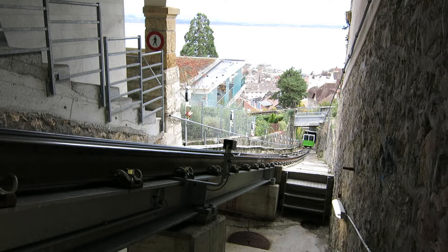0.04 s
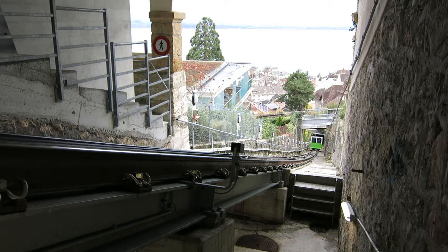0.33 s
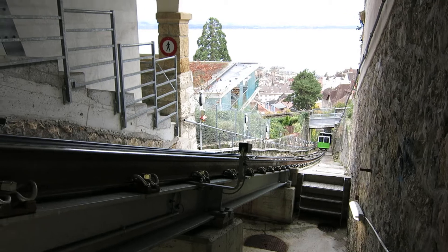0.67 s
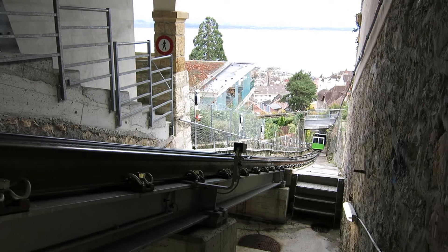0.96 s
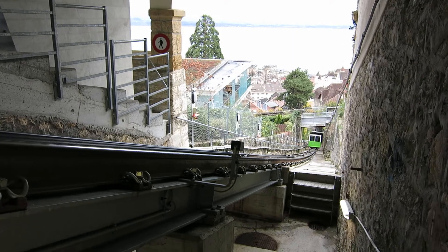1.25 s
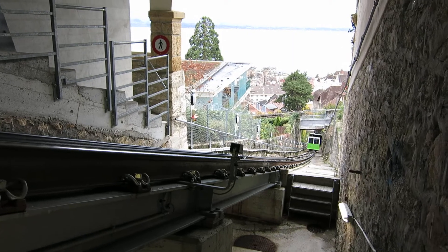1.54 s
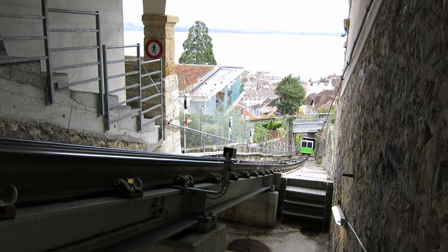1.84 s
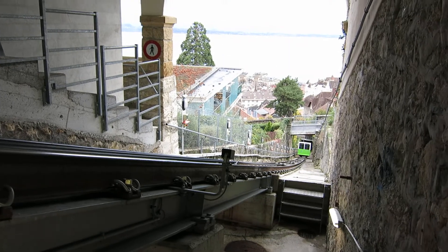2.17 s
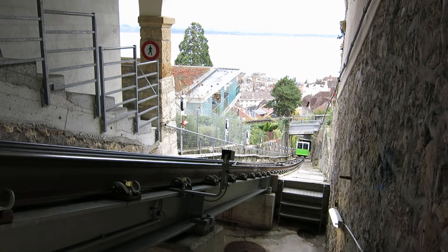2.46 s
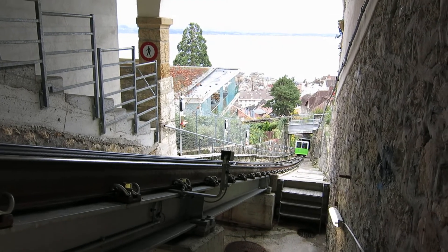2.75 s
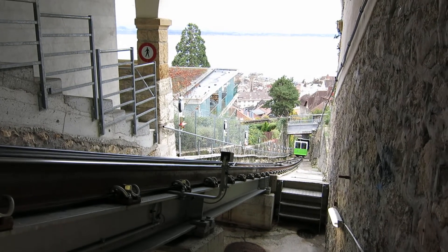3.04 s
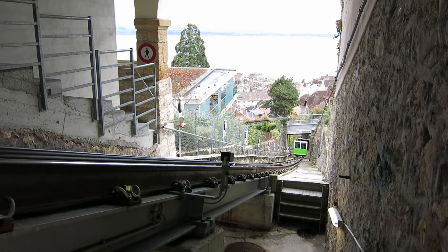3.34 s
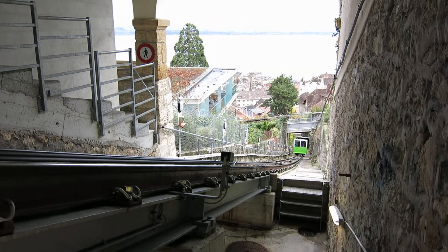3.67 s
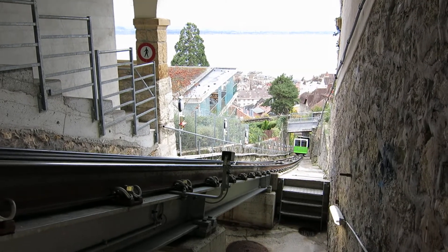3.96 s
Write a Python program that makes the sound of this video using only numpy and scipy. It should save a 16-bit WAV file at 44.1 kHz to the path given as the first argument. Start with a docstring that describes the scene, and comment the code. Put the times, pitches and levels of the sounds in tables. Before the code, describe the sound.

A funicular cable rumbles steadily over its pulleys under the hum and whine of the drive. A few sharp, close clicks with hollow knocks sound in the stone station, then a thin pulley ring swells over faint hiss.

```python
"""A stone funicular station: the cable rumbles over its ringing sheaves under the hum and whine of the drive.
The sound cuts in abruptly; the machinery is centred at first, then spreads very wide within half a second. Thin
hiss lies on top, brighter on the left. A few sharp, close clicks each carry a short hollow knock and a faint
answer from the stone walls."""
import sys
import numpy as np
from scipy.fft import rfft, irfft, next_fast_len
from scipy.io import wavfile
from scipy.ndimage import map_coordinates

SR = 44100
rng = np.random.default_rng(int(sys.argv[2]) if len(sys.argv) > 2 else 0)


def persist_wave(psi):
    """Save psi, clipped to +-1, as 16-bit WAV."""
    counts = np.round(np.clip(psi, -1, 1) * 32767).astype(np.int16)
    wavfile.write(sys.argv[1], SR, np.atleast_2d(counts).T)


N = 176400
T = np.arange(N) / SR


def amp(db):
    """Decibels to gain."""
    return 10 ** (np.asarray(db) / 20)


def along(points, hz):
    """Read (frequency [Hz], value) points on a log axis."""
    freqs, values = np.transpose(points)
    return np.interp(np.log(hz + 1), np.log(freqs + 1), values)


def fader(points):
    """A fader ride: (time [s], level [dB]) points as one gain per sample."""
    return amp(np.interp(T, *np.transpose(points)))


def eq(points):
    """An EQ curve through (frequency [Hz], gain [dB]) points."""
    return lambda hz: amp(along(points, hz))


def band(centre_hz, octaves):
    """A bell-shaped band-pass on a log axis."""
    return lambda hz: np.exp(-.5 * (np.log2((hz + 1) / centre_hz) / octaves) ** 2)


def filtered(x, response):
    """Run x through a complex frequency response."""
    size = next_fast_len(N + SR // 2)
    return irfft(rfft(x, size) * response(np.fft.rfftfreq(size, 1 / SR)), size)[..., :N]


def noise(spectrum):
    """Mono noise shaped by (frequency [Hz], density [dB/Hz]) points."""
    return filtered(rng.standard_normal(N), eq(spectrum)) * np.sqrt(SR / 2)


def stereo_noise(response, alike):
    """Coloured stereo noise of rms 1; alike is the correlation of its sides."""
    mid, side = filtered(rng.standard_normal((2, N)), response)
    spread = np.arccos(alike) / 2
    both = np.cos(spread) * mid + np.sin(spread) * np.array([side, -side])
    return both / both.std()


def wobble(per_s):
    """A smooth random modulator of rms 1, with per_s knots a second."""
    curve = map_coordinates(rng.standard_normal(1024), [T * per_s], mode="wrap")
    return curve / curve.std()


def tone(hz, unsteady, flutter_per_s):
    """A tone of rms 1, from pure (unsteady 0) to fully smeared (unsteady 1)."""
    flutter = wobble(flutter_per_s) + 1j * wobble(flutter_per_s)
    steady = np.sqrt(2 * (1 - unsteady ** 2))
    carrier = np.exp(2j * np.pi * (hz * T + rng.random()))
    return np.real((steady + unsteady * flutter) * carrier)


def mode(t, hz, db, t60, lag):
    """One dying stereo resonance, the right side trailing by lag radians."""
    return amp(db - 60 * t / t60) * np.sin(2 * np.pi * hz * t - np.array([[0], [lag]]))


# hiss colour on the left, on the right and in the middle (frequency [Hz], density [dB/Hz])
HISS_LEFT = [(60, -120), (600, -92), (2500, -100), (3400, -85), (4600, -86), (6000, -88.5), (8000, -89.5),
             (10000, -84), (11700, -80.5), (13000, -88.5), (15500, -101)]
HISS_RIGHT = [(60, -120), (600, -69), (2500, -82), (3400, -85), (4600, -89), (6000, -107), (8000, -103),
              (11700, -104), (15500, -114)]
HISS_MIDDLE = [(60, -120), (600, -95), (2500, -91.5), (3400, -107.5), (4600, -89.5), (6000, -92.5),
               (8000, -101), (11700, -107), (15500, -118)]
# fader ride of the hiss bed (time [s], level [dB])
HISS_RIDE = [(.25, 1), (.72, 5.5), (.79, -0.5), (1.55, -0.5), (1.6, -3), (2.1, -1.5), (3.84, -2.5),
             (3.9, -4), (4, -4)]
# hiss swells (start [s], end [s], rise [s], fall [s], centre [Hz], width [oct], left [dB], right [dB])
HISS_SWELLS = [ (.3, 0.49, 0.088, 0.056, 10600, 0.23, -48, -43),
               (.2, 0.727, .02, .022, 4300, 0.5, -43, -45), (0.46, 0.673, .05, .04, 4900, 0.62, -47, -40.5),
               (2.36, 2.375, .025, .16, 11500, .3, -47.5, -69), ]

def hiss():
    """A thin bed of hiss, brighter on the left, with a few brief, narrow-band swells."""
    sides = np.array([noise(HISS_LEFT), noise(HISS_RIGHT)])
    out = fader(HISS_RIDE) * (sides + noise(HISS_MIDDLE))
    for start, end, rise, fall, centre_hz, octaves, left_db, right_db in HISS_SWELLS:
        outside_hold = np.maximum(np.maximum((start - T) / rise, (T - end) / fall), 0)
        swell = stereo_noise(band(centre_hz, octaves), alike=.92) * np.exp(-outside_hold ** 2)
        out += amp([[left_db], [right_db]]) * swell
    return out


# ring of the snap (frequency [Hz], level [dB], t60 [s], right-side lag [rad])
SNAP_MODES = [(1820, -12, 0.0058, .5), (3560, -4, .003, 1.4), (4430, 0.5, 0.0031, 2),
              (6070, -26, .005, 2.4)]

def snap(t, rasp, rasp_t60_s=.01, wall_db=-18.5, wall_t60_s=.09):
    """A click's attack: very short modes and a burst of rasp, faintly answered by the stone walls."""
    ring = sum(mode(t, *row) for row in SNAP_MODES)
    burst = amp(-60 * t / rasp_t60_s)
    wall_tail = amp(wall_db - 60 * t / wall_t60_s)
    return ring + rasp * (burst + wall_tail)


# hollow body of the knock (frequency [Hz], level [dB], t60 [s])
KNOCK_MODES = [(315, 1, .045), (430, -6, .03), (560, 0, .028), (690, -3, .022), (1350, -9, .009),
               (2300, -15, .006)]

def knock(t, tilt_db, pivot_hz=500, rise_s=.0011, right_db=-1):
    """A click's body: damped modes tilted by tilt_db an octave, the sides nearly opposite in phase."""
    body = sum(mode(t, hz, db + tilt_db * np.log2(hz / pivot_hz), t60, lag=3.1)
               for hz, db, t60 in KNOCK_MODES)
    attack = 1 - np.exp(-t / rise_s)
    return amp([[0], [right_db]]) * body * attack


# EQ of the snap's rasp and of the bright tick (frequency [Hz], gain [dB])
RASP_EQ = [(400, -3), (2000, 9), (2800, -4), (4600, -3), (6400, 4), (7500, -26), (11000, -24), (16000, -35)]
TICK_EQ = [(1500, -2), (5500, 2), (8500, -1), (11000, -9), (13300, -3), (15500, -10)]
# click cues (time [s], snap [dB], tick [dB], knock [dB], knock tilt [dB/oct])
CLICK_CUES = [(1.098, -9, -21, -16, -1), (1.1145, -22, -46, -16, 0), (1.3049, -28, -34, -12.5, -5),
              (1.561, -27, -24.5, -10, 3), (1.676, -28, -32, -16.5, -6)]

def clicks(rasp_db=-8, tick_right_db=-6, tick_t60_s=.0046, low_cut_hz=110):
    """Sharp, close clicks, each stacked from a snap, a bright tick of noise and a hollow knock."""
    rasp = amp(rasp_db) * stereo_noise(eq(RASP_EQ), alike=.16)
    tick = amp([[0], [tick_right_db]]) * stereo_noise(eq(TICK_EQ), alike=.16)
    out = np.zeros((2, N))
    t = np.arange(SR // 2) / SR
    for start_s, snap_db, tick_db, knock_db, tilt_db in CLICK_CUES:
        onset = round(start_s * SR)
        span = slice(onset, onset + len(t))
        out[:, span] += amp(snap_db) * snap(t, rasp[:, span])
        out[:, span] += amp(tick_db - 60 * t / tick_t60_s) * tick[:, span]
        out[:, span] += amp(knock_db) * knock(t, tilt_db)
    return filtered(out, lambda hz: (1j * hz / (low_cut_hz + 1j * hz)) ** 2)


# rumble of cable and sheaves (frequency [Hz], density [dB/Hz])
CABLE_RUMBLE = [(15, -110), (28, -94), (42, -76.5), (56, -70.5), (90, -61.5), (160, -63), (210, -54.5),
                (300, -53), (390, -51), (470, -45), (610, -47.5), (700, -48.5), (810, -48), (875, -46.5),
                (920, -52.5), (985, -47), (1070, -50), (1250, -52.5), (1460, -54.5), (1570, -61.5),
                (1760, -62.5), (2100, -68.5), (2500, -72.5), (3000, -81.5), (4000, -95.5), (8000, -115)]
# fader ride of the sheaves' ring (time [s], level [dB])
SHEAVE_RIDE = [(.25, -61), (1.85, -54), (2.2, -21.5), (2.45, -38), (2.75, -22), (3.2, -31), (3.8, -22),
               (4, -22)]

def cable():
    """The cable rumbles over its sheaves, whose narrow ring swells in the second half."""
    ring = filtered(rng.standard_normal(N), band(centre_hz=823, octaves=.08))
    return noise(CABLE_RUMBLE) + fader(SHEAVE_RIDE) * ring / ring.std()


# quiet partials of the drive (frequency [Hz], level [dB], unsteady share [0-1])
DRIVE_PARTIALS = [(110, -45, .9), (130, -41.5, .95), (148, -44, .8), (174, -42.5, .85), (228, -41, .8),
                  (759.5, -40, .7), (982.6, -39, .7), (1117, -38, .8), (1155, -41, .8), (1189, -42, .6),
                  (1491, -44, .6), (1649, -50, .5), (1771.5, -49, .5), (2331, -50.5, .5), (2797, -62, .7),
                  (2890.5, -58, .5), (3484, -65, .5)]
# fader rides of the drive's hum and whine (time [s], level [dB])
HUM_RIDE = [(.25, -24), (.65, -26), (1.15, -32), (1.38, -27.5), (1.6, -27), (1.82, -35), (1.92, -23),
            (2.1, -31), (2.25, -28), (2.9, -32), (3.35, -31), (3.52, -24), (3.68, -32), (3.8, -27),
            (4, -32)]
WHINE_RIDE = [(.25, -15.5), (.5, -19), (.66, -19), (.8, -24), (1.55, -22.5), (1.7, -24), (2.1, -24.5),
              (2.2, -21), (2.3, -25), (2.48, -25), (2.53, -18), (2.6, -24), (3.0, -25.5), (3.47, -21.5),
              (3.68, -24), (3.82, -21.5), (4, -23.5)]

def drive(drone_db=-33):
    """The running drive: wavering partials, a low smeared drone, a swelling hum and a rough whine."""
    partials = sum(amp(db) * tone(hz, unsteady, flutter_per_s=11) for hz, db, unsteady in DRIVE_PARTIALS)
    drone = amp(drone_db) * tone(hz=279.7, unsteady=.85, flutter_per_s=20)
    hum = fader(HUM_RIDE) * tone(hz=558, unsteady=.7, flutter_per_s=24)
    whine = fader(WHINE_RIDE) * tone(hz=1131.5, unsteady=.52, flutter_per_s=42)
    return partials + drone + hum + whine


def machinery(swell_db=.5, judder_db=.64):
    """Cable and drive swell and judder together as the cable runs unevenly."""
    running = cable() + drive()
    return running * amp(swell_db * wobble(per_s=6.59) + judder_db * wobble(per_s=37))


# EQ of the wide layer's mid channel (frequency [Hz], gain [dB])
MID_EQ = [(50, -0.5), (115, 2.5), (170, -1.5), (280, -3), (450, -9.5), (740, -13.5), (1200, -16),
          (2200, -14)]
# phase of that mid channel behind the side channel (frequency [Hz], lag [rad])
MID_LAG = [(120, 1.53), (280, 1.19), (500, 1), (900, 0.046), (1800, 0)]
# EQ of the centred layer (frequency [Hz], gain [dB])
CENTRE_EQ = [(40, 10), (120, 11), (280, 5.5), (550, -3), (850, 0), (1150, -4.5), (2000, 2), (3500, 8)]
# fader rides of the wide and centred layers (time [s], level [dB])
WIDE_RIDE = [(.25, -14), (.36, -6), (.46, -3), (.56, -2.5), (.68, 1.5), (1.15, -1), (1.55, .7), (1.65, -2),
             (2.1, -0.7), (2.4, 0), (3.05, -1.3), (3.3, -1), (3.83, -0.4), (3.9, -3.5), (4, -4.5)]
CENTRE_RIDE = [(.25, -0.5), (.72, 0), (.79, -8.5), (1.0, -11), (1.55, -12), (1.6, -23), (4, -17.5)]

def stereo_machinery():
    """The machinery crossfades from centred to wide, its sides opposite in phase above the bass."""
    side = machinery()
    mid = filtered(side, lambda hz: amp(along(MID_EQ, hz)) * np.exp(-1j * along(MID_LAG, hz)))
    wide = np.array([mid + side, mid - side])
    centre = filtered(machinery(), eq(CENTRE_EQ))
    return fader(WIDE_RIDE) * wide + fader(CENTRE_RIDE) * centre


def scene():
    """The stereo mix of machinery, hiss and clicks."""
    return stereo_machinery() + hiss() + clicks()


def record(dry, cut_in_s=.243, top_hz=15850):
    """Master chain: a hard cut in, clipping at full scale and a brick-wall low-pass."""
    clipped = np.clip(dry * (T >= cut_in_s), -1, 1)
    return filtered(clipped, lambda hz: hz < top_hz)


dry = scene()
out = record(dry)
persist_wave(out)
```